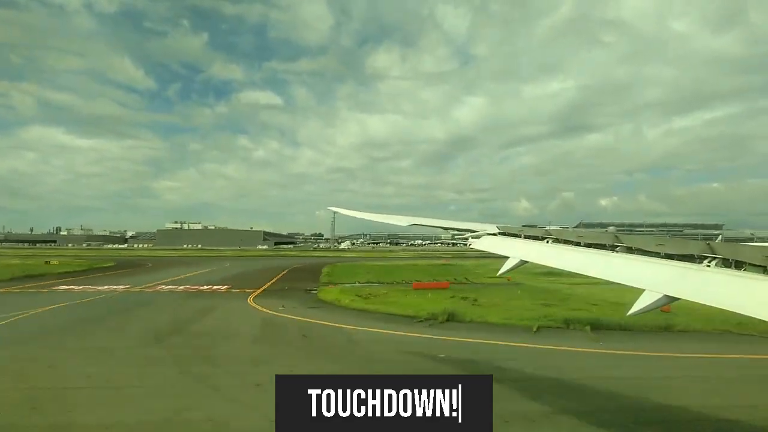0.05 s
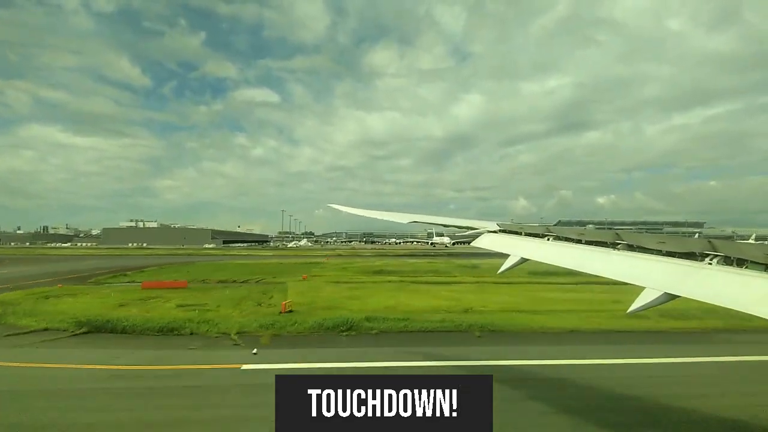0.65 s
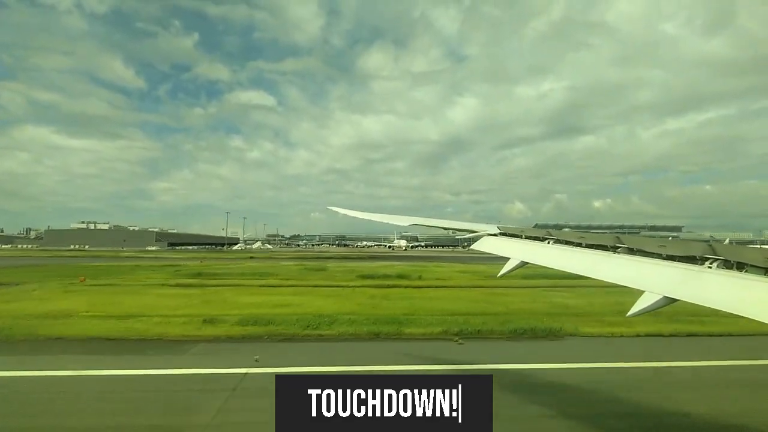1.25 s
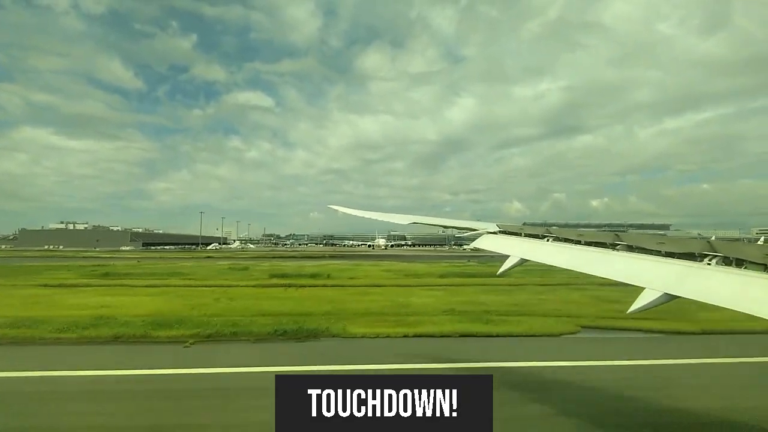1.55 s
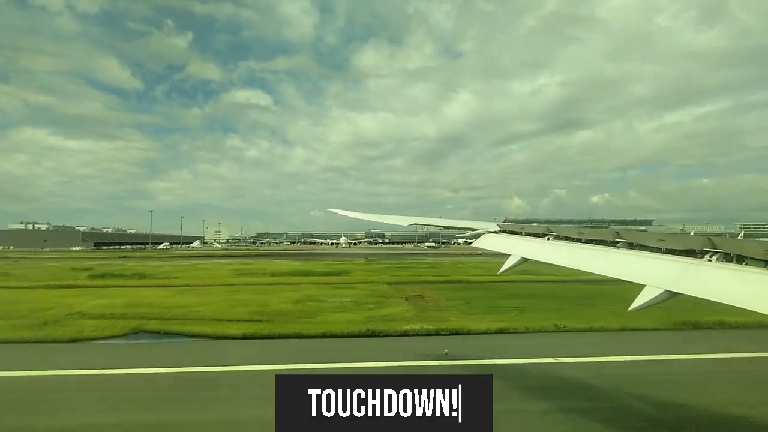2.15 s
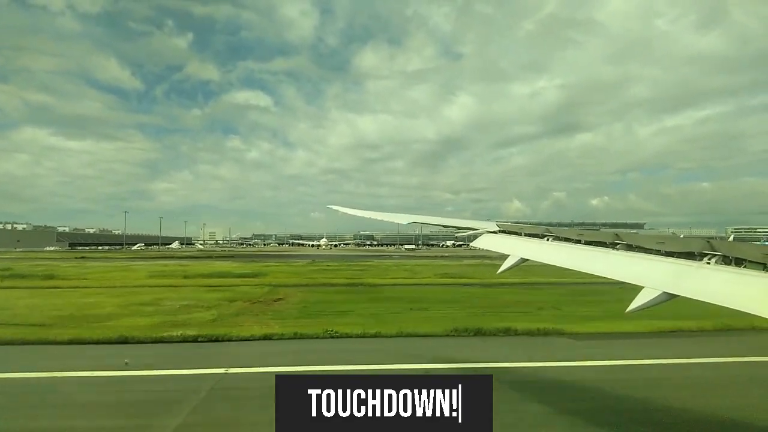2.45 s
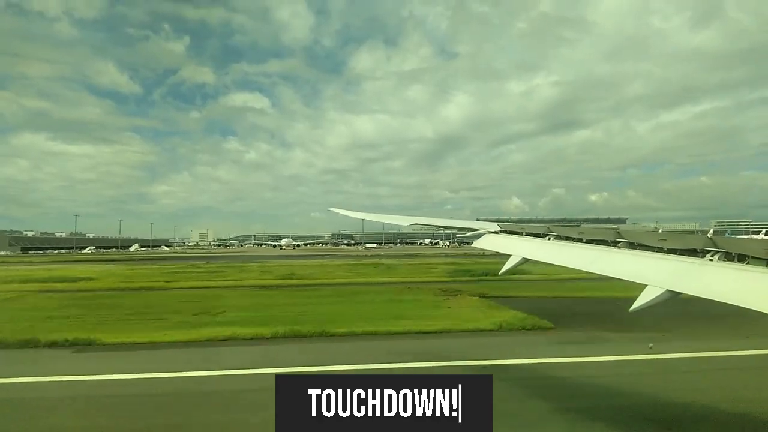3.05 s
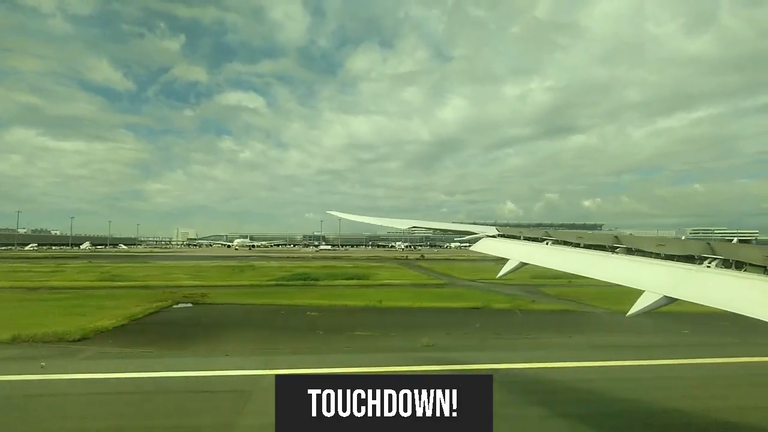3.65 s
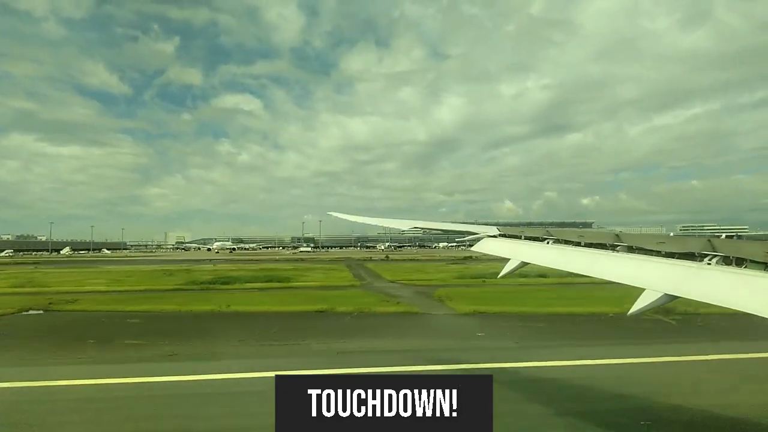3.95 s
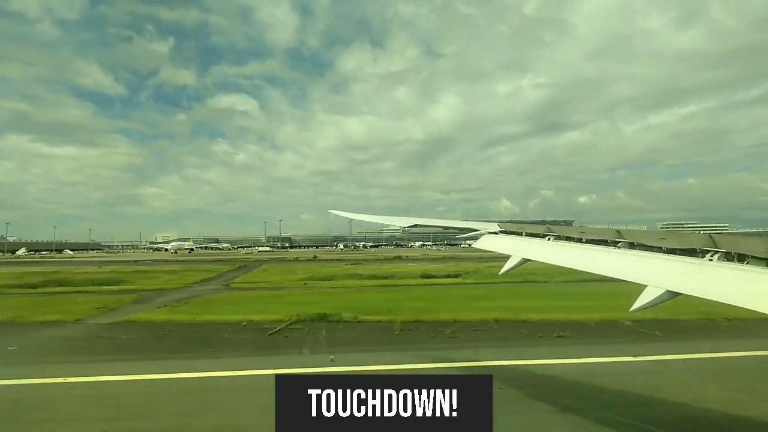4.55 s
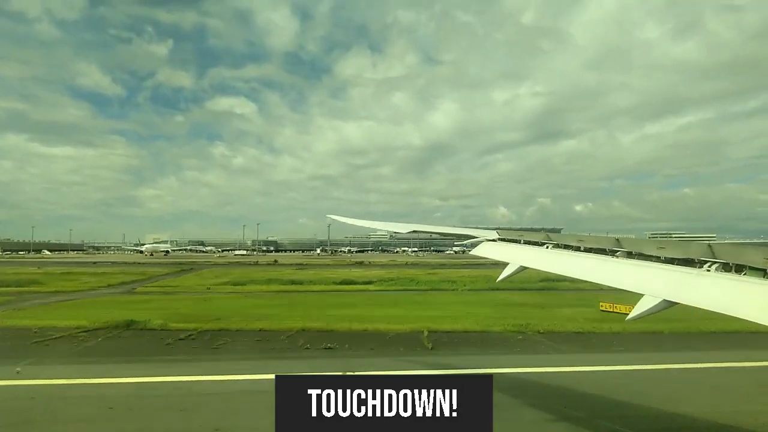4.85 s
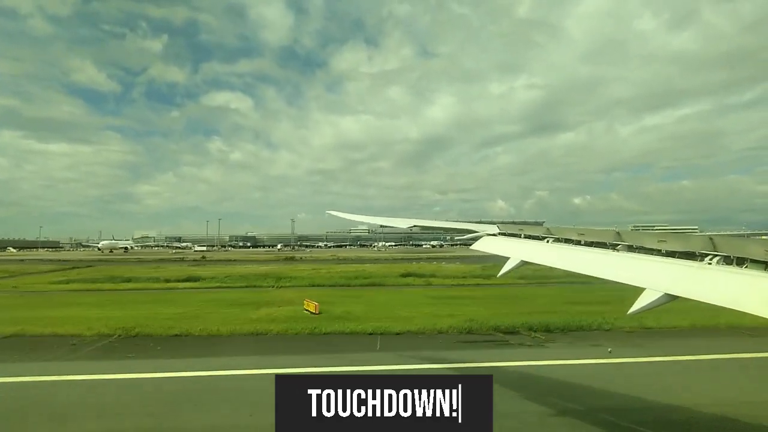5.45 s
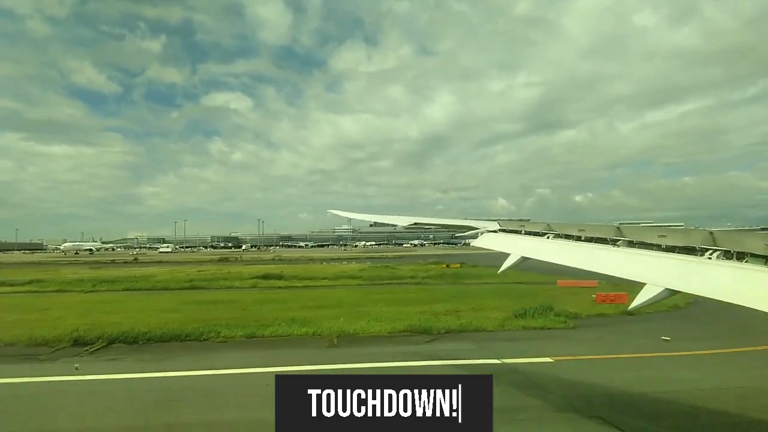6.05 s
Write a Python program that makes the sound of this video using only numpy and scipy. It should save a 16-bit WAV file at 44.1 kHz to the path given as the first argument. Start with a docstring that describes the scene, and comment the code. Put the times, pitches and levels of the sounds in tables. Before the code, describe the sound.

Deep wheel rumble and engine roar inside a landing plane, chopped by tiny dropouts, while loose panels buzz and tick.

```python
"""A deep rumble and a chopped-up roar: an airliner rolls out after touchdown, heard from a window seat.
The wheels boom through the fuselage, the engines surge and air rushes past.
Loose fittings buzz, trim panels tick and squeak, and cabin equipment whines faintly.
The shaking keeps overloading the microphone, which blocks for a few milliseconds at a time."""
import sys
import numpy as np
from scipy import signal
from scipy.fft import rfft, irfft, next_fast_len
from scipy.io import wavfile
from scipy.ndimage import uniform_filter1d, minimum_filter1d

SR = 44100
rng = np.random.default_rng(int(sys.argv[2]) if len(sys.argv) > 2 else 0)


def persist_wave(psi):
    """Save psi, clipped to +-1, as 16-bit WAV."""
    counts = np.round(np.clip(psi, -1, 1) * 32767).astype(np.int16)
    wavfile.write(sys.argv[1], SR, np.atleast_2d(counts).T)


N = 277830
TIME_S = np.arange(N) / SR
HISS_BAND_HZ = (3400, 9000)
# hardest runway bumps: centre_s, length_s
BUMPS = [(.126, 0.01), (0.181, 0.006), (0.252, 0.0053), (0.34, 0.0069), (0.448, 0.0045), (0.455, 0.0058),
         (0.467, 0.0085), (.525, 0.0067), (.595, 0.0066), (.680, 0.0092), (0.719, .0105), (.739, 0.017),
         (0.878, .0095), (.913, .0093), (.962, 0.0053), (1.028, 0.0045), (1.091, .0065), (1.252, 0.0085),
         (1.266, 0.0077), (1.312, .012), (1.4502, .011), (1.526, 0.0077), (1.6165, 0.017), (1.68, 0.011),
         (1.74, 0.0059), (1.823, 0.0086), (1.878, 0.0095), (1.945, .0048), (2.0835, .011), (2.134, .008),
         (2.156, 0.0037), (2.335, 0.0086), (2.516, 0.0055), (2.5305, 0.0065), (2.544, 0.0077),
         (2.978, .0065), (2.985, 0.0074), (3.1195, 0.02), (3.233, 0.0071), (3.292, 0.0065), (3.457, 0.014),
         (3.583, .008), (3.604, 0.0054), (3.6166, 0.0048), (3.6366, 0.0064), (3.656, 0.0089),
         (3.711, 0.011), (3.757, 0.0094), (3.782, .007), (3.796, 0.0087), (3.813, 0.0054), (3.97, 0.0089),
         (4.183, 0.0096), (4.211, .008), (4.268, 0.0064), (4.341, 0.0056), (4.362, .005), (4.3953, .0105),
         (4.408, 0.0055), (4.469, 0.0072), (4.51, 0.0065), (4.569, 0.007), (4.587, 0.01), (4.7127, 0.0061),
         (4.725, 0.0084), (5, 0.012), (5.0368, 0.022), (5.084, 0.013), (5.1333, 0.017), (5.1745, 0.0041),
         (5.1856, 0.012), (5.3266, 0.016), (5.361, 0.0083), (5.378, 0.0098), (5.392, 0.009), (5.419, .004),
         (5.435, 0.0043), (5.445, .0085), (5.471, 0.01), (5.4898, .0075), (5.525, .0096), (5.569, 0.0074),
         (5.684, 0.011), (5.811, 0.0067), (5.8282, .010), (5.858, .011), (5.889, 0.0089), (5.951, .0063),
         (5.991, 0.0063), (6.028, 0.0064), (6.092, .0092), (6.166, 0.0045), (6.203, 0.005), (6.233, 0.0091),
         (6.2485, 0.0083), (6.256, 0.0049), (6.283, .006)]


def from_db(db):
    """Decibels to gain."""
    return 10 ** (np.asarray(db) / 20)


def unit_rms(x):
    """Scale to rms 1."""
    return x / np.sqrt(np.mean(x ** 2) + 1e-20)


def curve(rows, at_s=TIME_S):
    """Interpolate rows of time_s, value."""
    return np.interp(at_s, *np.transpose(rows))


def swells(rows):
    """Sum of bell curves from rows of centre_s, half_s, height."""
    return sum(height * np.exp(-((TIME_S - centre_s) / half_s) ** 2) for centre_s, half_s, height in rows)


def drift(rate_hz):
    """Slow random wander, rms about 1."""
    step, warmup = 40, 2000
    pole = np.exp(-2 * np.pi * rate_hz * step / SR)
    noise = rng.standard_normal(N // step + warmup + 2)
    slow = signal.lfilter([1], [1, -2 * pole, pole * pole], noise)[warmup:]
    return np.interp(np.arange(N) / step, np.arange(len(slow)), unit_rms(slow))


def resonate(x, hz, width_hz):
    """Two-pole resonance, peak gain 1."""
    r = np.exp(-np.pi * width_hz / SR)
    feedback = [1, -2 * r * np.cos(2 * np.pi * hz / SR), r * r]
    return signal.lfilter(np.array([1, 0, -1]) * (1 - r * r) / 2, feedback, x + 1e-18)


def ring(x, hz, width_hz):
    """Two equal resonances in series, output rms 1."""
    return unit_rms(resonate(resonate(x, hz, width_hz), hz, width_hz))


def narrow_noise(hz, width_hz):
    """Steep-sided noise band, rms 1."""
    return ring(rng.standard_normal(N), hz, 2 * width_hz)


def turbulence(spectrum):
    """Noise shaped by rows of freq_hz, relative_db; rms 1."""
    size = next_fast_len(N)
    freq_hz, relative_db = np.transpose(spectrum)
    bins_hz = np.maximum(np.arange(size // 2 + 1) * SR / size, 1)
    gain = from_db(np.interp(np.log(bins_hz), np.log(freq_hz), relative_db, left=-120, right=-120))
    return unit_rms(irfft(rfft(rng.standard_normal(size)) * gain, size)[:N])


def equipment_whine():
    """Thin steady tones of the cabin equipment."""
    # whines: pitch_hz, rms_db
    tones = [(10540, -81.5), (13165, -90)]
    return sum(from_db(db) * np.sqrt(2) * np.sin(2 * np.pi * hz * TIME_S) for hz, db in tones)


def panel_squeaks():
    """Brief slips of a rubbing panel ring one narrow resonance."""
    # slips: centre_s, half_s, rms_db
    slips = [(0.835, .007, -54.5), (.863, .012, -54.5)]
    rubbing = swells((centre_s, half_s, from_db(db)) for centre_s, half_s, db in slips)
    return rubbing * narrow_noise(hz=7260, width_hz=130)


def trim_ticks(rise_s=0.0018, top_hz=13500, small_per_s=3, small_db=-53.5, scatter_db=3):
    """Plastic panels knock together: soft-edged scuffs in one broad resonance, small ones at random."""
    # loudest ticks: start_s, peak_db, pitch_hz
    loud = [(.303, -39, 6900), (.585, -47, 9000), (1.208, -47, 9000), (2.205, -42, 9000),
            (3.359, -39, 6800), (3.411, -38, 7100), (4.321, -45, 7500), (4.839, -40, 4530),
            (5.111, -38, 7950), (5.648, -44, 7500), (6.099, -42, 8000)]
    small = [(when * TIME_S[-1], small_db + scatter_db * (2 * force - 1),
              np.interp(pitch, [0, 1], [6000, 10500]))
             for when, force, pitch in rng.random((round(small_per_s * N / SR), 3))]
    age_s = TIME_S[:SR // 40]
    envelope = age_s / rise_s * np.exp(-age_s / rise_s)
    out = np.zeros(N + SR)
    for start_s, peak_db, pitch_hz in loud + small:
        tick = resonate(rng.standard_normal(len(age_s)) * envelope, pitch_hz, width_hz=2200)
        at = round(start_s * SR)
        out[at:at + len(tick)] += from_db(peak_db) * tick / np.abs(tick).max()
    return signal.sosfilt(signal.butter(6, top_hz, fs=SR, output="sos"), out[:N])


def loose_fittings(surge_db, base_db=-60, slowing_db_per_s=0.75, surge_scale=2.2, patchy_db=2.2):
    """Small contacts ring the fittings' modes, each swelling on its own; few reach the top modes."""
    # fitting modes: pitch_hz, width_hz, relative_db, contacts_per_s
    modes = [(4370, 1100, 5, 1500), (5600, 1300, 7, 1900), (6600, 2200, 9, 810), (7500, 2300, 6, 440),
             (9250, 2200, -6.5, 300), (12000, 2600, -7.5, 150)]
    # rattle swells and lulls: centre_s, half_s, change_db
    rattles = [(.87, .04, 5), (1.2, .03, 1), (1.34, 0.046, 3), (3.38, 0.12, 10), (3.85, .1, -4),
               (4.2, .12, 4), (4.87, .08, 4), (5.44, .14, -12), (5.72, .082, 2), (6.05, 0.21, 10.5)]
    buzz = np.zeros(N)
    for pitch_hz, width_hz, relative_db, contacts_per_s in modes:
        contacts = (rng.random(N) < contacts_per_s / SR) * rng.standard_normal(N)
        buzz += from_db(relative_db + patchy_db * drift(rate_hz=13)) * ring(contacts, pitch_hz, width_hz)
    level_db = base_db - slowing_db_per_s * TIME_S + surge_scale * surge_db + swells(rattles)
    return from_db(level_db) * unit_rms(buzz)


def air_rush(surge_db, gust_db, base_db=-32.5):
    """Air streams along the fuselage, swelling with the engines."""
    # airflow spectrum: freq_hz, relative_db
    spectrum = [(300, -0.5), (750, 3), (1050, 1), (1800, -7.5), (2800, -12.5), (3500, -16.5), (4300, -19.5),
                (5200, -25.5), (7500, -31.5), (9000, -36.5), (12800, -41), (14500, -55), (17000, -60)]
    # swishes: centre_s, half_s, rise_db
    swishes = [(2.78, 0.02, 2.5), (3.06, .025, 1.5), (3.38, 0.039, 2), (4.66, 0.027, 1), (4.86, 0.046, 1),
               (5.28, 0.045, 2.5), (5.72, .07, 0.5)]
    return from_db(base_db + 0.45 * surge_db + swells(swishes) + gust_db / 2) * turbulence(spectrum)


def engines(surge_db, gust_db, roar_db=-17, drone_db=-36):
    """Surging turbulent roar with a narrow, wavering drone."""
    # roar spectrum: freq_hz, relative_db
    spectrum = [(100, -29.5), (195, -1.5), (275, -1.5), (330, -8.5), (410, -11), (480, -11), (560, -17.5),
                (680, -17), (780, -26.5), (1500, -46.5), (4000, -79.5)]
    # drone swells: centre_s, half_s, rise_db
    drone_swells = [(.52, .044, 11), (5.76, .06, 7)]
    roar = from_db(roar_db + 0.9 * surge_db + gust_db) * turbulence(spectrum)
    drone = from_db(drone_db + swells(drone_swells)) * narrow_noise(hz=597, width_hz=11)
    return roar + drone


def wheels(rumble_db=-12, boom_db=-24.5, slowing_db_per_s=0.04):
    """Tyres rumble and excite a booming cabin resonance, easing slightly as the aircraft slows."""
    # rumble spectrum: freq_hz, relative_db
    spectrum = [(25, -15), (42, -14), (60, -3), (72, -2), (98, 3), (140, 3), (175, -9), (300, -18),
                (700, -77)]
    # harder pounding: centre_s, half_s, rise_db
    pounding = [(.4, 0.11, 0.5), (.85, .15, 2.5), (3.7, 0.31, 0.3), (5.06, .1, 2), (5.43, 0.098, 3.5)]
    drive_db = swells(pounding) - slowing_db_per_s * TIME_S
    rumble = from_db(rumble_db + drive_db) * turbulence(spectrum)
    boom = from_db(boom_db + drive_db) * narrow_noise(hz=127.3, width_hz=17.6)
    return rumble + boom


def hiss_flutter(x, own_db=1.96, together_db=0.94, band_count=14):
    """Narrow bands of the hiss swell and thin, partly together."""
    shared_db = together_db * drift(rate_hz=8)
    edges_hz = np.geomspace(*HISS_BAND_HZ, band_count + 1)
    below = [signal.sosfiltfilt(signal.butter(12, hz, fs=SR, output="sos"), x) for hz in edges_hz]
    bands = np.diff(below, axis=0)
    return x + sum((from_db(shared_db + own_db * drift(rate_hz=5.6)) - 1) * band for band in bands)


def hiss_dips(x):
    """The hiss dulls briefly in the worst shaking."""
    # dips: centre_s, half_s, change_db
    dips = [(3.83, .12, -1.5), (4.48, 0.068, -2), (5.08, 0.076, -2), (5.44, .085, -6)]
    hiss = signal.sosfiltfilt(signal.butter(4, HISS_BAND_HZ, "band", fs=SR, output="sos"), x)
    return x - (1 - from_db(swells(dips))) * hiss


def treble_hollows(x, waver=0.4):
    """Narrow treble bands dip by a varying amount: a hollow sound."""
    # notches: centre_hz, width_hz, base_db
    notches = [(3130, 110, -3), (3540, 190, -5.5), (3995, 170, -9.5), (4940, 140, -3), (6250, 170, -5),
               (8140, 220, -4)]
    # notch depth over time: time_s, scale
    hollowness = [(0, .5), (.7, 1), (1.2, .4), (1.8, 1.3), (3.3, 0.55), (3.8, 1.2), (4.7, 0.66), (5.1, 2.2),
                  (5.45, 2.4), (5.7, .8), (6.1, 2)]
    for centre_hz, width_hz, base_db in notches:
        depth_db = base_db * curve(hollowness) * np.exp(waver * drift(rate_hz=2))
        x = x - (1 - from_db(depth_db)) * resonate(x, centre_hz, width_hz)
    return x


def tremors(per_s=52, spread=0.51, longest_s=0.0044, clearance_s=0.009):
    """Random tremors between bumps, longer on rough runway; rows of centre_s, length_s."""
    # runway roughness: time_s, typical_length_s
    roughness = [(0, 0.0023), (.55, 0.0033), (1.9, 0.0021), (2.75, 0.0026), (3.65, 0.0037), (4.3, 0.0018),
                 (4.9, .002), (5.45, 0.0034), (5.68, 0.0018), (6.3, 0.0045)]
    centres_s = np.cumsum(rng.gamma(2, size=600)) / (2 * per_s)
    scatter = np.exp(spread * rng.standard_normal(len(centres_s)) - spread ** 2 / 2)
    lengths_s = np.minimum(curve(roughness, centres_s) * scatter, longest_s)
    clear = np.abs(centres_s[:, None] - np.array(BUMPS)[:, 0]).min(axis=1) > clearance_s
    return zip(centres_s[clear], lengths_s[clear])


def microphone_blocking(x, edge_s=0.0006, depth_db=-16, deepening_db_per_s=-1300):
    """Each jolt pins the microphone and its output almost stands still; longer jolts pin it harder."""
    passed = np.ones(N)
    for centre_s, length_s in [*BUMPS, *tremors()]:
        start = max(round((centre_s - length_s / 2) * SR), 0)
        end = round((centre_s + length_s / 2) * SR)
        passed[start:end] *= from_db(depth_db + deepening_db_per_s * length_s)
    pinned = uniform_filter1d(1 - passed, round(edge_s * SR))
    steps = np.diff(x, prepend=x[:, :1])
    return np.cumsum(steps * (1 - pinned), axis=-1)


def limiter(x, ceiling=0.8, hold_s=0.046):
    """Gain eases down just ahead of each peak that would pass the ceiling."""
    size = round(hold_s * SR)
    needed_gain = np.minimum(1, ceiling / (np.abs(x) + 1e-9))
    return x * uniform_filter1d(minimum_filter1d(needed_gain, size), size)


def scene():
    """All the sound that reaches the seat, mono."""
    # engine surge: time_s, change_db
    surge = [(0, 2), (.5, 0.5), (1.4, 0.4), (2.8, 0), (3.75, -1.1), (4.4, -0.1), (4.85, 1), (5.05, -1),
             (5.45, -2), (5.75, 2), (6.0, -3), (6.3, -2.5)]
    surge_db = curve(surge)
    gust_db = 0.5 * drift(rate_hz=7.6)
    rolling = wheels() + engines(surge_db, gust_db) + air_rush(surge_db, gust_db)
    rolling += loose_fittings(surge_db)
    cabin = hiss_dips(hiss_flutter(rolling)) + trim_ticks() + panel_squeaks() + equipment_whine()
    return treble_hollows(cabin)[None]


def record(dry, low_cut_hz=57, noise_db=-79, top_hz=15800):
    """The microphone blocks and the low cut sinks its held output to rest; then limiter, noise, top cut."""
    held = microphone_blocking(dry)
    settled = signal.sosfilt(signal.butter(4, low_cut_hz, "high", fs=SR, output="sos"), held)
    out = limiter(settled) + from_db(noise_db) * rng.standard_normal(N)
    return signal.sosfilt(signal.ellip(10, 0.1, 80, top_hz, fs=SR, output="sos"), out)


dry = scene()
out = record(dry)
persist_wave(out)
```